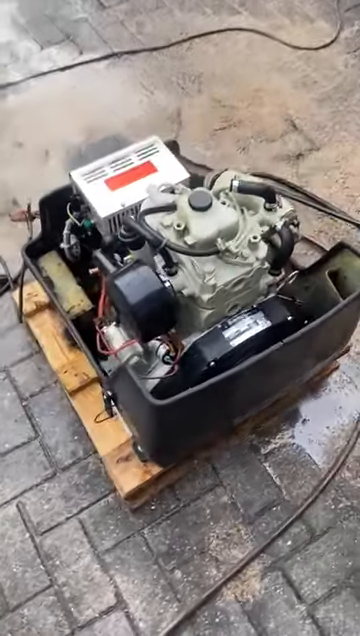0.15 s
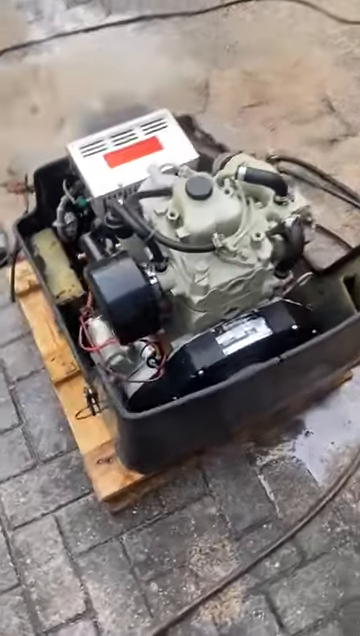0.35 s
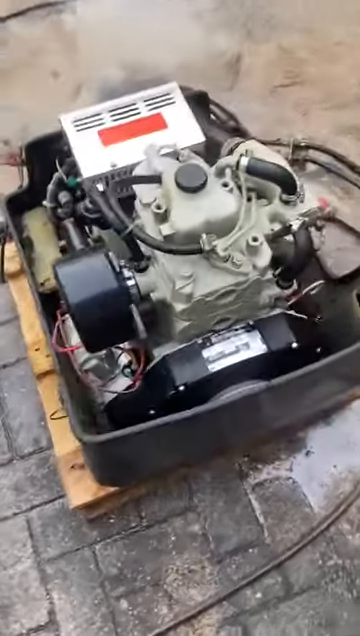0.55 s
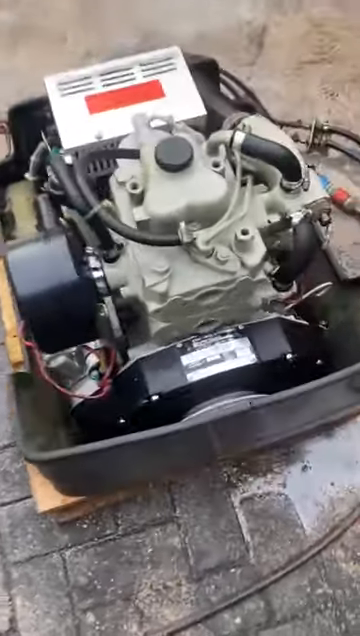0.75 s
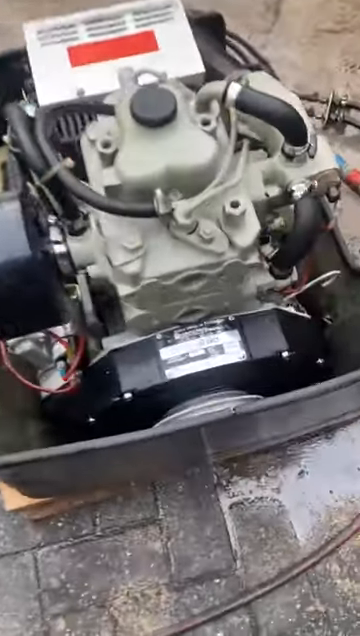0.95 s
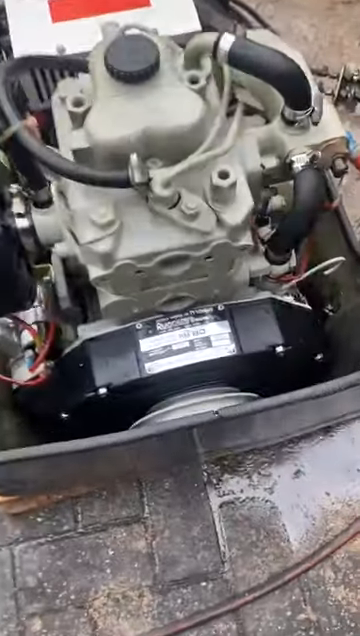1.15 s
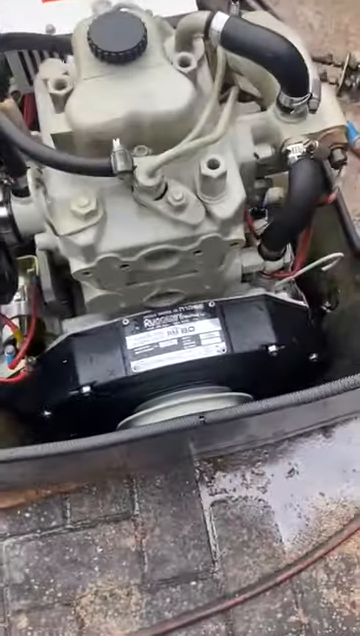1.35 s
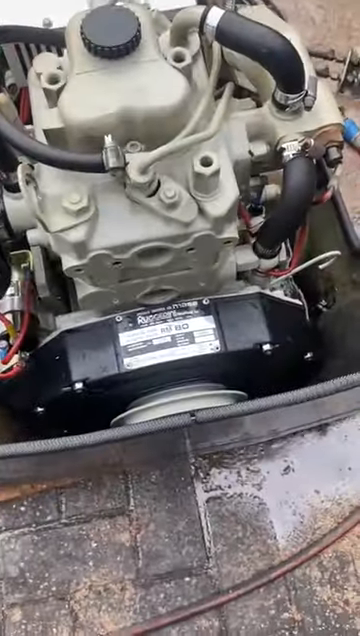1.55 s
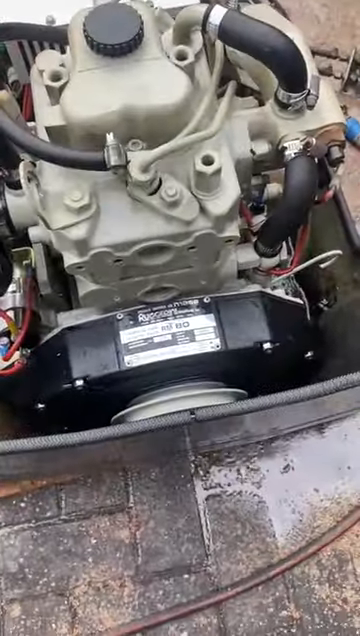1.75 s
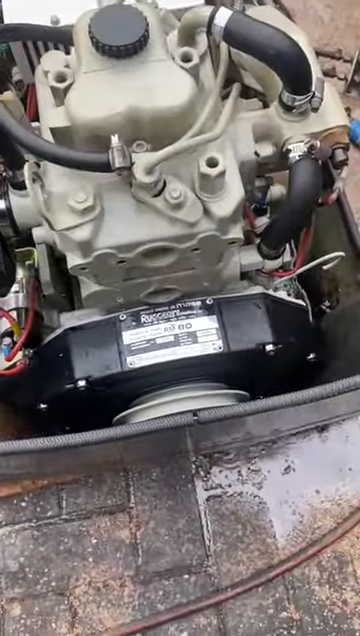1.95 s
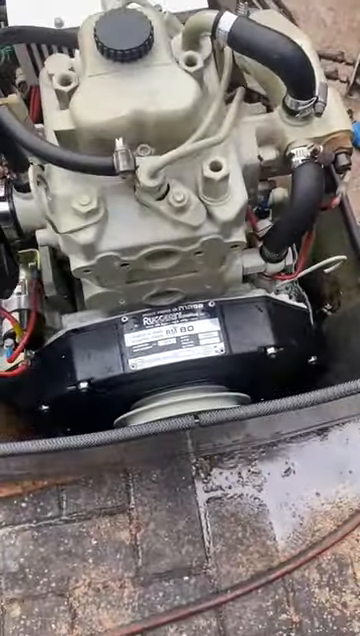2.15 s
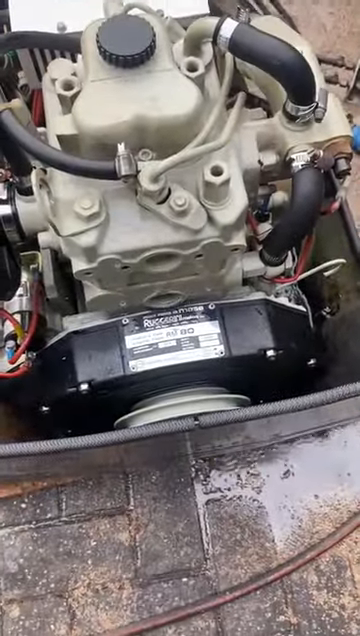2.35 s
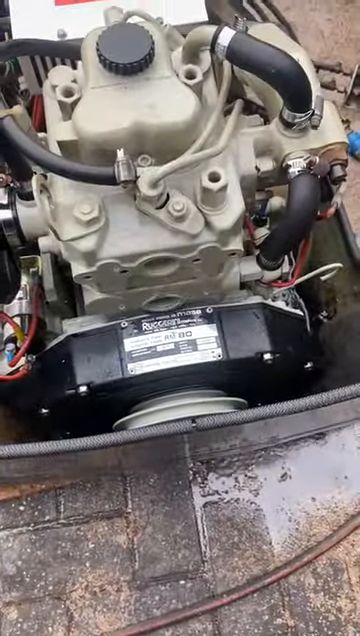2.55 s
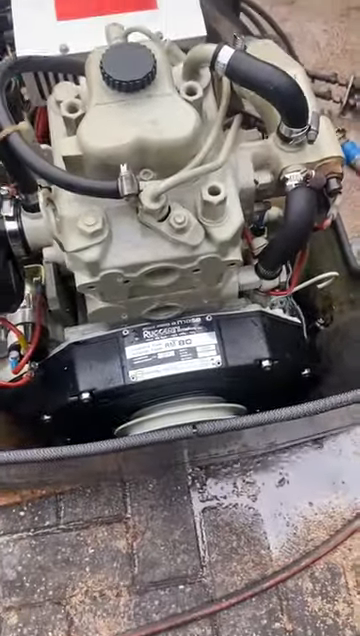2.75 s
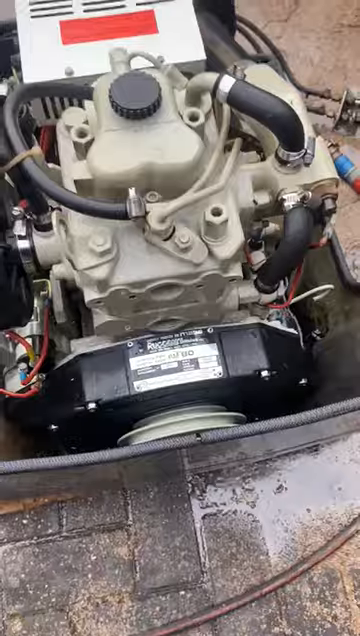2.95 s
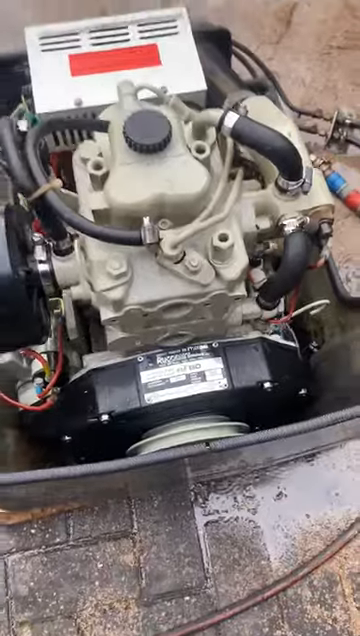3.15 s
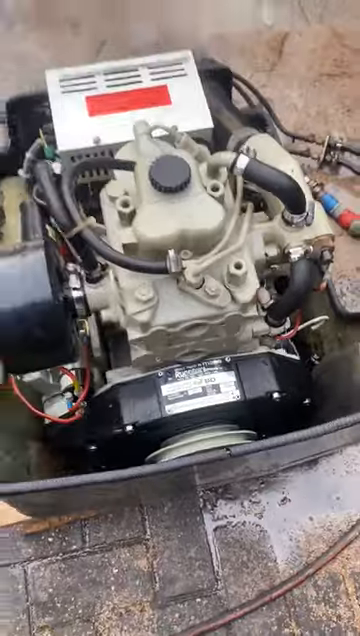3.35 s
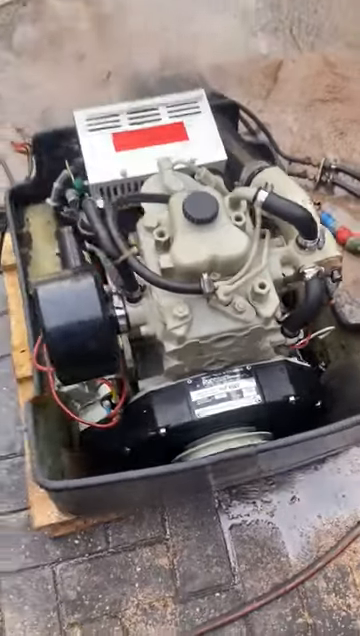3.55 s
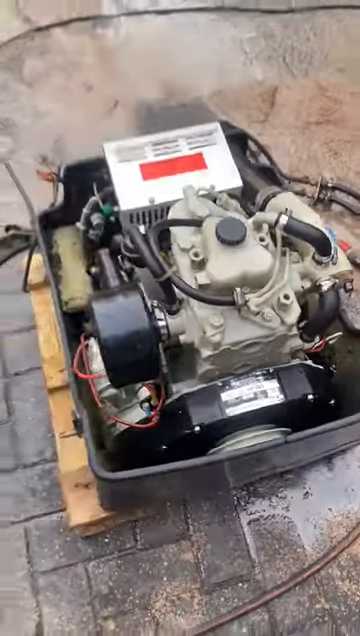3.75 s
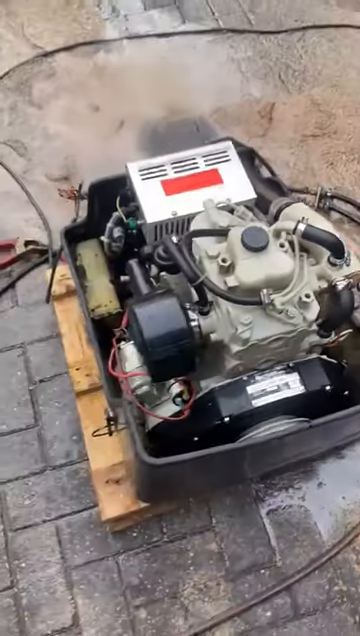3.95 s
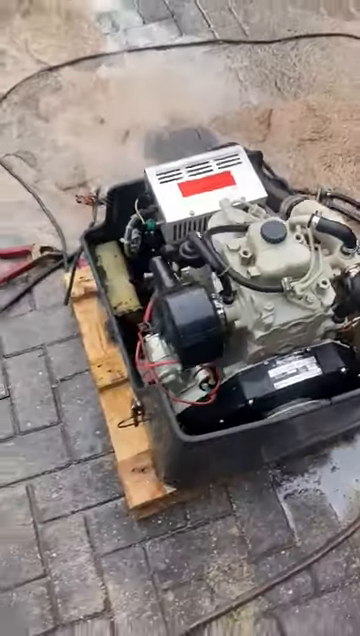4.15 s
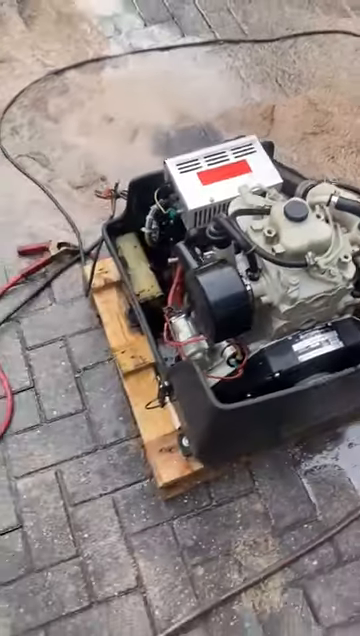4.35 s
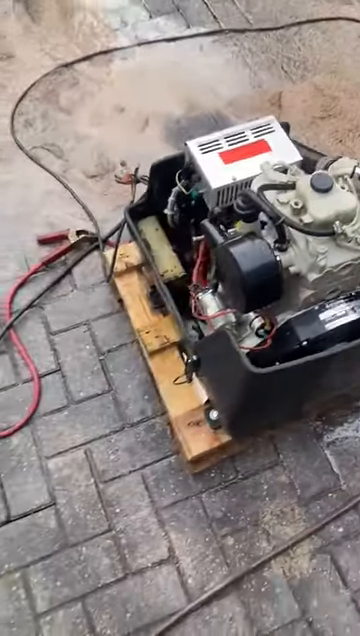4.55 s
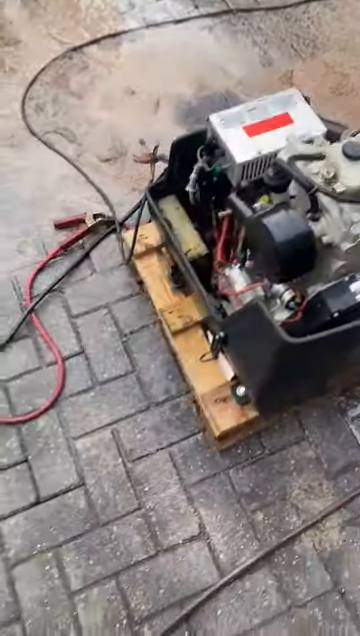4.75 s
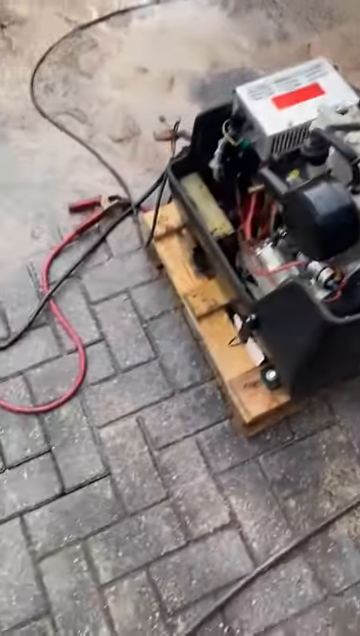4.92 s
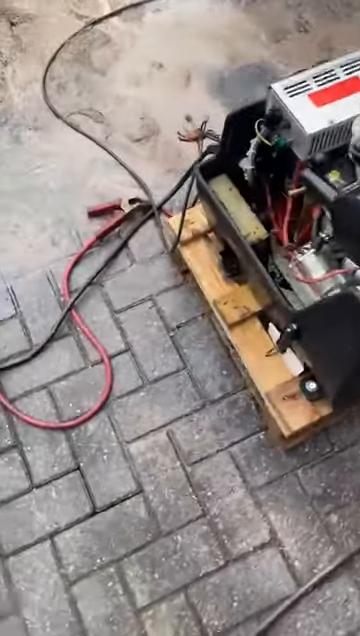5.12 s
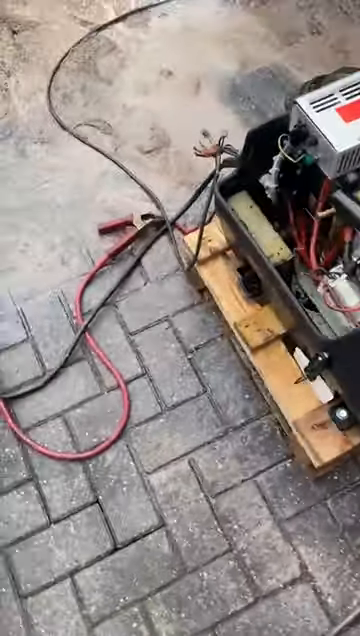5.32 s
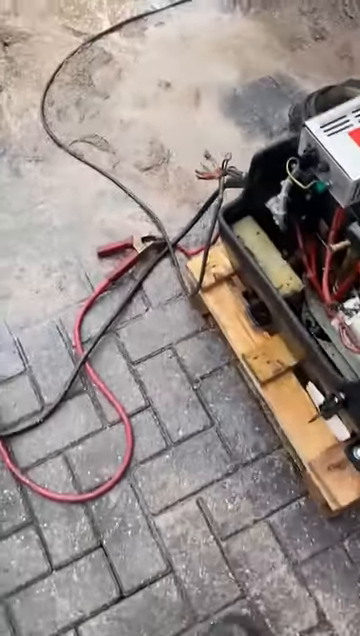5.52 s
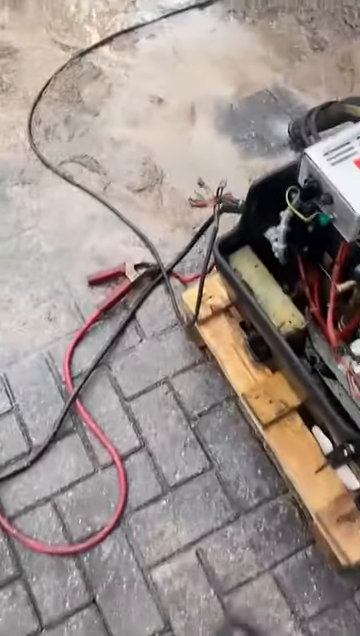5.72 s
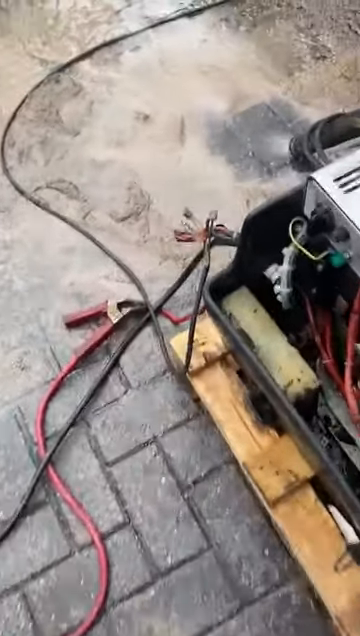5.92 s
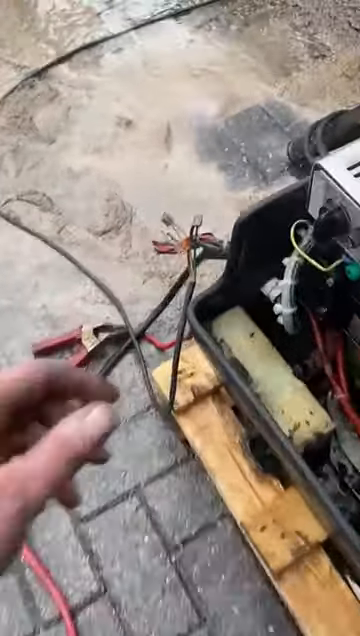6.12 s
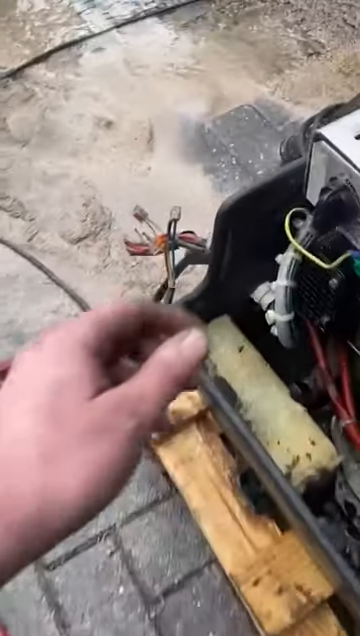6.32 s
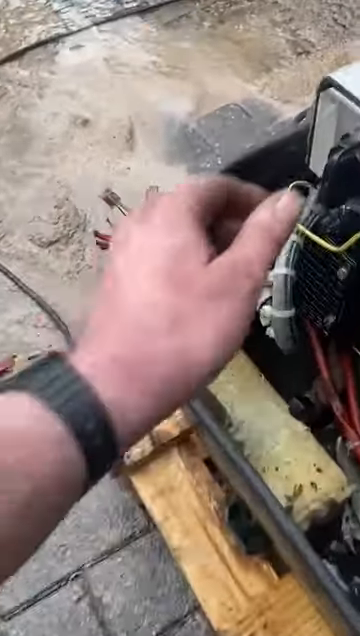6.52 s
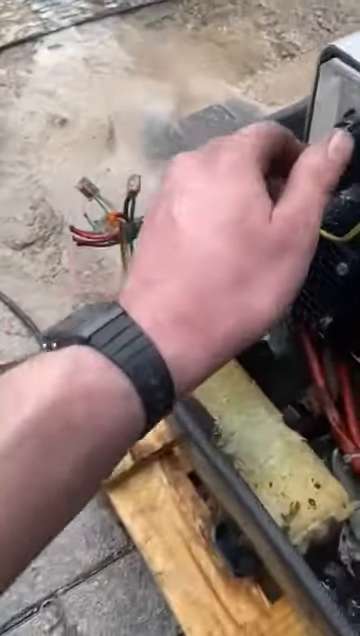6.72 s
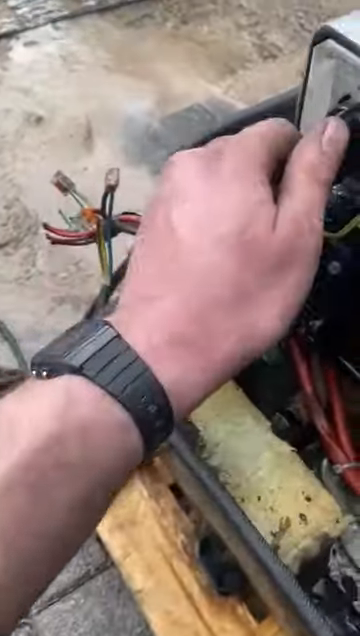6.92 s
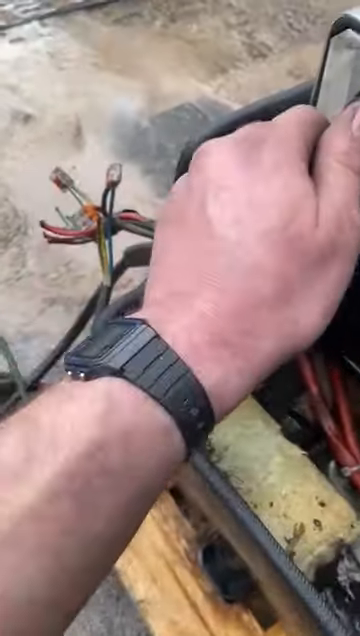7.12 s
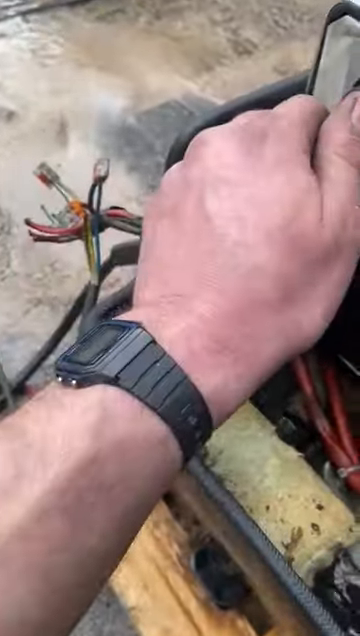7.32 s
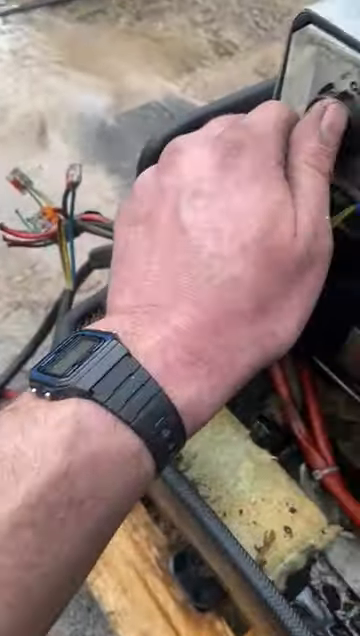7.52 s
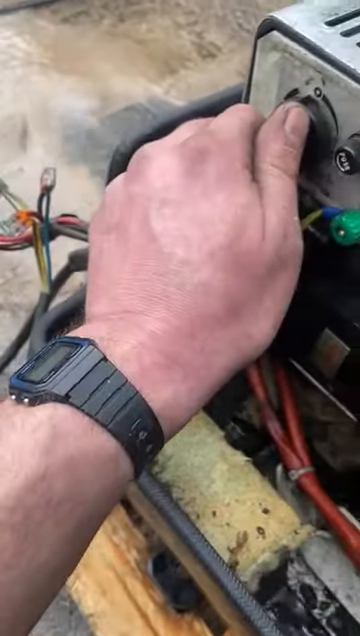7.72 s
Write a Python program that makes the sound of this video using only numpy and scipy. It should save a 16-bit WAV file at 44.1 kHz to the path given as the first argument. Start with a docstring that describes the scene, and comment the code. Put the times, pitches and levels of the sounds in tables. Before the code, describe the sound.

Rapid, even diesel popping with metallic knocks, valve ticks and faint gear whine, heard from a moving close microphone outdoors, never stopping.

```python
"""A single-cylinder diesel generator runs at a slightly hunting speed in a paved yard; the listener leans in over it,
backs off, then walks past the exhaust outlet to the control panel. In each cycle blows and ticks ring block, head,
rockers and casing, then the valve opens: pipe and silencer ring and the exhaust pops as a falling chirp.
Noise hisses and gear sines whine throughout; the paving returns a dulled echo whose lag follows the listener."""
import sys
import numpy as np
from scipy import signal
from scipy.fft import rfft, irfft, next_fast_len
from scipy.io import wavfile

SR = 44100
rng = np.random.default_rng(int(sys.argv[2]) if len(sys.argv) > 2 else 0)


def int16_out(signal):
    """Quantize to a 16-bit WAV file."""
    q = np.round(np.clip(np.atleast_2d(signal).T, -1, 1) * 32767)
    wavfile.write(sys.argv[1], SR, q.astype(np.int16))


def makeup_ratio(level_db):
    """Linear amplitude ratio for a level in decibels (20 dB per factor of ten)."""
    decades = np.asarray(level_db, float) / 20
    return 10 ** decades


N = 347508
LEAD = SR // 2      # samples run before the start: the engine is already going
SIZE = N + LEAD

# Blows on block and head in one cycle. Each row: time after the pop in ms, level on the block in dB,
# level on the head in dB, level on the head at the panel end in dB, scatter in dB.
BLOW_ROWS = [(-13.5, -6, -4, -4, 1.1), (-10.5, -2.5, -0.5, -3, .6), (-9, -6, -5.5, -11, 1.5),
             (-0.86, -0.5, -7.5, -2.5, 0.7), (6.5, -16, -13.5, -15, 2.5), (9.5, -9.5, -9, -4, 1),
             (14, -19, -12.5, -16, 3), (19, -13.5, -14.5, -9, 1.5)]


def rms_one(x):
    """Scale to rms 1."""
    return x / np.sqrt(np.mean(x ** 2) + 1e-20)


def in_time(rows, t):
    """Columns of a table read at the times t."""
    s, *columns = np.transpose(rows)
    return [np.interp(t, s, c) for c in columns]


def at_hz(rows, hz):
    """Columns of a table read on a log-frequency axis."""
    f, *columns = np.transpose(rows)
    return [np.interp(np.log(hz), np.log(f), c) for c in columns]


def by_place(values, place):
    """A value given for each of the five places, read along the walk."""
    return np.interp(place, np.arange(len(values)), values)


def drift(rate_hz):
    """Slow random wander of rms 1: noise through two equal poles at SR / 40."""
    r = np.exp(-80 * np.pi * rate_hz / SR)
    noise = rng.standard_normal(SIZE // 40 + 2002)
    slow = signal.lfilter([1], [1, -2 * r, r * r], noise)[2000:]
    return np.interp(np.arange(SIZE) / 40, np.arange(len(slow)), rms_one(slow))


def running(t):
    """The governor hunts a little: cycle count, time since the nearest pop, and the time of every pop."""
    # Each row: time in s, speed in cycles per s.
    speed_rows = [(0, 26.2307), (4.0, 26.1085), (4.9, 26.1726), (6.5, 26.1364), (7.9, 26.1685)]
    first_pop_s = 0.0141
    speed_hz, = in_time(speed_rows, t)
    cycles = np.cumsum(speed_hz) / SR
    cycles -= np.interp(first_pop_s, t, cycles)
    cycle_s = 1 / speed_hz.mean()
    whole = np.arange(np.ceil(cycles[0]) + 1, cycles[-1] + 1)
    return dict(
        speed_hz=speed_hz, cycles=cycles, cycle_s=cycle_s,
        since_ms=1000 * cycle_s * (cycles - np.round(cycles)),
        index=(np.round(cycles) - np.round(cycles[0])).astype(int),
        pops_s=np.interp(whole, cycles, t + LEAD / SR, right=SIZE / SR))      # from the start of the lead


def walking(t):
    """Where the listener is: distance, share of the way round, echo detour, casing pitch there and place."""
    # Each row: time in s, distance in m, way round to the panel end from 0 to 1,
    # extra path over the paving in m, pitch of the open casing heard there in Hz.
    walk_rows = [(0, 0.94, 0, 1.31, 1580), (.55, 0.82, 0.2, 1.38, 1720), (.9, 0.56, 0, 0.7, 1735),
                 (1.3, 0.51, 0.03, 0.866, 1700), (1.9, 0.51, 0, 0.83, 1710), (2.8, 0.51, 0, 0.89, 1713),
                 (3.25, 0.54, 0.07, 0.81, 1720), (3.6, 0.7, 0.14, 1.31, 1750),
                 (4.3, 0.87, 0.19, 1.27, 1580), (4.8, 0.95, 0, 1.2, 1630), (5.2, 1.12, 0.31, 0.94, 1610),
                 (5.8, 0.72, 0.36, 1.16, 1450), (6.25, 0.51, 0.85, 1.05, 1470),
                 (6.55, 0.41, 0.95, 0.96, 1570), (7.0, 0.46, 1, 0.74, 1750), (7.88, 0.54, 1, 0.72, 1740)]
    # Each row: time in s, place (0 leaning over, 1 in front, 2 at the corner, 3 by the outlet, 4 at the panel);
    # values below 0 count as 0.
    place_rows = [(0, 1.5), (.5, 0.56), (.95, -0.5), (3.2, -0.5), (3.7, 1.5), (4.45, 0.74), (4.9, 1.5),
                  (5.55, 2.5), (5.95, 3.5), (6.3, 3.5), (6.65, 3.5)]
    distance_m, round_share, detour_m, casing_hz = in_time(walk_rows, t)
    place = np.clip(in_time(place_rows, t)[0], 0, 4)
    return dict(distance_m=distance_m, round_share=round_share, detour_m=detour_m,
                casing_hz=casing_hz, place=place)


def heard(part, listener):
    """Level in dB of one part: distance law, followed in part, plus a gain on the way to the panel."""
    # Each entry: level at leaning distance in dB, share of the distance law followed, gain at the panel end in dB.
    part_levels = {"pipe": (-18.5, 0.48, 0.94), "case": (-20.3, 0.67, 6.8), "silencer": (-27, -0.63, 2.1),
                   "pop": (-22.5, 0.59, 0.92), "block": (-25.5, 0.76, -2.2), "head": (-32.5, 0.3, 3),
                   "rockers": (-39, 0.75, 3.6), "hiss": (-31, 1.04, 0.11), "gears": (-38.5, 0.13, 2.8),
                   "cover": (-27.5, 2, -3.5), "panel": (-38, 1.0, 9), "whirr": (-40.5, 1.8, 1.7),
                   "casing": (-29, 2.4, -1.7), "echo against pop": (-15.5, 1.1, -2.5),
                   "fan against hiss": (-1.25, -0.17, 3.4)}
    leaning_m = 0.5
    db, share, panel_db = part_levels[part]
    distance_db = 20 * np.log10(listener["distance_m"] / leaning_m)
    return db - share * distance_db + panel_db * listener["round_share"]


def ring(clicks, hz, t60_s):
    """A click train sets one two-pole mode ringing; rms 1."""
    r, w = makeup_ratio(-60 / (t60_s * SR)), 2 * np.pi * hz / SR
    return rms_one(signal.lfilter([0, 1], [1, -2 * r * np.cos(w), r * r], clicks + 1e-18))


def struck(modes, pops_s, place, ms, db, scatter_db, jitter_ms, swing=1):
    """Blows of scattered time and strength ring every mode; each place hears its own mix; rms 1."""
    late_ms = ms + jitter_ms * rng.standard_normal((len(pops_s), len(ms)))
    at = ((pops_s[:, None] + late_ms / 1000) * SR).astype(int)
    at = np.clip(at, 0, SIZE - 1)
    out = 0
    for k, (hz, t60_s, *levels_db) in enumerate(modes):
        clicks = np.zeros(SIZE)
        clicks[at] = makeup_ratio(db + scatter_db * rng.standard_normal(at.shape))
        gain = swing ** k * makeup_ratio(by_place(levels_db, place))      # negative swing: neighbours start opposite
        out = out + gain * ring(clicks, hz, t60_s)
    return rms_one(out)


def block_and_head(engine, listener):
    """Each cycle's blows ring the modes of block and head; the head's blow levels shift toward the panel."""
    # Each row: mode in Hz, T60 in s, relative level in dB at each of the five places.
    block_modes = [(337.6, 0.19, -6.5, 5, -2.5, -0.5, 2), (418.8, 0.43, 1.5, 0.5, 5.5, 2, 2),
                   (444.2, 0.1, -2, -6, -5, -10, 6), (493, 0.33, 5, -25, -13.0, -9, -11.5),
                   (575.6, 0.21, -0.5, -14, 0.5, -2, 2), (616, 0.36, -6, -2, 1, -11, -2.5),
                   (690, 0.16, -28, -15, -10, -7, -9), (758.6, 0.18, 4, 5, 5, 0.5, -8),
                   (870.4, 0.061, -6, 0, 5.5, -6, 1.5), (925, 0.17, -5, -7.5, -4.5, -5, -8),
                   (1072, 0.093, -1.5, -7, -10, 0.5, -3), (1171, 0.2, -4.5, -3, -13, -8, -9.5),
                   (1278, 0.073, -10, -11, -8.5, -16, -21)]
    # Each row: mode in Hz, T60 in s, relative level in dB at each of the five places.
    head_modes = [(1570, 0.039, -3, -6.5, -7, -2, -2), (1850, 0.037, -1.5, -4.5, -3, -4, -12),
                  (2078, 0.045, 0, -2.5, -5, -4, -5), (2274, 0.01, -3, 3.5, 4, 6.5, 1),
                  (2500, 0.05, -3, -5.5, -2, -10, -7), (2670, 0.17, -13, -6, -14, -3, -5)]
    pops_s, place = engine["pops_s"], listener["place"]
    ms, block_db, head_db, head_at_panel_db, scatter_db = np.transpose(BLOW_ROWS)
    round_at_pop = np.interp(pops_s, np.arange(SIZE) / SR, listener["round_share"])[:, None]
    head_db = head_db + (head_at_panel_db - head_db) * round_at_pop
    block = struck(block_modes, pops_s, place, ms, block_db, scatter_db, jitter_ms=0.014, swing=-1.012)
    head = struck(head_modes, pops_s, place, ms, head_db, scatter_db, jitter_ms=0.037)
    return makeup_ratio(heard("block", listener)) * block + makeup_ratio(heard("head", listener)) * head


def valve_ticks(engine, listener):
    """The valve gear ticks on the rockers, mostly while the cylinder breathes."""
    # Each row: mode in Hz, T60 in s, relative level in dB at each of the five places.
    rocker_modes = [(2930, 0.03, -16.5, -22, -9, -3, -13), (3540, 0.012, -6.5, -11, -6.5, -6.5, -7.5),
                    (3987, 0.05, -15, -3.5, -17.5, -18, -16), (4580, 0.03, -8, -8, -16, -14, -15),
                    (4900, 0.03, -23, -18, -25.5, -11, -13), (5140, 0.024, -21, -5, -27, -15.5, -7.5),
                    (5810, 0.016, -12.5, -18, -31, -12, -3)]
    # Each row: time after the pop in ms, level in dB, scatter in dB.
    tick_rows = [(-13.5, -3, 3), (-10, -5.5, 3.5), (2.5, -1.5, 2), (6, -6.5, 4), (8.5, -4, 4), (11, 2, 0.5),
                 (14, -3, 1.5), (16.5, -3.5, 2.5)]
    ms, db, scatter_db = np.transpose(tick_rows)
    rockers = struck(rocker_modes, engine["pops_s"], listener["place"], ms, db, scatter_db, jitter_ms=0.12)
    return makeup_ratio(heard("rockers", listener)) * rockers


def knock_tone(engine, hz, db, t60_ms, starts_ms, scatter_db=0.8):
    """One dying tone after each combustion knock, with a strength and pitch (1 % spread) of its own."""
    cycle_ms = 1000 * engine["cycle_s"]
    since_ms, index = engine["since_ms"], engine["index"]
    after_ms = (since_ms - starts_ms) % cycle_ms
    knock = index - (since_ms < starts_ms)
    strength, detune = rng.standard_normal((index.max() + 1, 2))[knock].T
    shape = (1 - np.exp(-after_ms / 0.89)) * makeup_ratio(-60 * after_ms / t60_ms)
    shape = shape * np.sqrt(28 * cycle_ms / t60_ms)      # about equal power whatever the T60
    turns = hz * (1 + 0.01 * detune) * after_ms / 1000
    return makeup_ratio(db + scatter_db * strength) * shape * np.sin(2 * np.pi * turns)


def sheet_metal(engine, listener):
    """Open casing, shroud, rocker cover and panel sheet each answer the knock with one dying tone."""
    # Casing level in dB at each of the five places.
    casing_levels_db = (1.5, 2.5, -5, -5, 7.5)
    # Shroud level in dB at each of the five places.
    shroud_levels_db = (-35.5, -39.5, -41, -45, -37)
    t60_ms, t60_at_panel_ms = 39, 14.5
    casing_t60_ms = t60_ms + (t60_at_panel_ms - t60_ms) * listener["round_share"] ** 3
    casing_db = heard("casing", listener) + by_place(casing_levels_db, listener["place"])
    shroud_db = by_place(shroud_levels_db, listener["place"])
    out = knock_tone(engine, listener["casing_hz"], casing_db, casing_t60_ms, starts_ms=-13.5)
    out += knock_tone(engine, 2093, shroud_db, t60_ms=12, starts_ms=-12.5)
    out += knock_tone(engine, 800, heard("cover", listener), t60_ms=22, starts_ms=-13.0, scatter_db=0.3)
    out += knock_tone(engine, 2246, heard("panel", listener), t60_ms=12.4, starts_ms=-13.0)
    return out


def throb(engine, listener):
    """Combustion rings the low case modes; the opening valve rings pipe and silencer."""
    # Each row: mode in Hz, T60 in s, relative level in dB at each of the five places.
    case_modes = [(107.5, 0.5, -8.0, -9.5, -6.5, -8.0, -5.5), (154, 0.5, 0.0, 1.5, 2.5, -2.5, -0.5),
                  (185, 0.5, -2.0, -3.5, -2.5, -1.5, -2.0)]
    # Each row: mode in Hz, T60 in s, relative level in dB at each of the five places.
    pipe_modes = [(52, 0.45, -4.5, -6.5, -6.0, -5.5, -4.0), (79.8, 0.45, -0.5, 0.5, 0.0, 0.0, 0.5),
                  (129.8, 0.45, -7.5, -11.0, -10.0, -7.0, -10.5)]
    # Each row: mode in Hz, T60 in s, relative level in dB at each of the five places.
    silencer_modes = [(235.2, 0.43, -1.5, 0, 0, 2.5, -3.5), (287.2, .35, -12.5, -6.5, -12.5, -7.5, -9),
                      (314.1, .2, -28, -19.5, -14, -11, -11.5)]
    burning_ms, opening_ms = np.array([-13.4]), np.array([-1.9])      # after the pop
    pops_s, place = engine["pops_s"], listener["place"]
    case = struck(case_modes, pops_s, place, burning_ms, 0, 0.34, jitter_ms=0.099)
    pipe = struck(pipe_modes, pops_s, place, opening_ms, 0, 0.33, jitter_ms=0.3)
    silencer = struck(silencer_modes, pops_s, place, opening_ms, 0, 0.26, jitter_ms=0.027)
    out = makeup_ratio(heard("case", listener)) * case
    out += makeup_ratio(heard("pipe", listener)) * pipe
    return out + makeup_ratio(heard("silencer", listener)) * silencer


def exhaust_pop(engine, listener):
    """The exhaust slug leaves the pipe as a short falling chirp, its bass partly shielded by the casing."""
    # Each row is one place: pitch at the peak in Hz, fall of pitch in ms, tail in ms, level in dB,
    # share of the bass shielded from 0 to 1.
    pop_rows = [(635, 1.94, 2.08, -1.1, .15), (687, 2.26, 1.58, 0.2, .15), (640, 3.4, 1.84, -0.1, .3),
                (600, 7.8, 2.3, -0.1, .5), (560, 6.2, 1.6, -1.4, .55)]
    rise_ms, bass_hz = 0.76, 250
    outlet_at, outlet_width, outlet_db = 0.56, 0.47, 5      # on the way round, 0 to 1
    since_ms, index = engine["since_ms"], engine["index"]
    hz, fall_ms, tail_ms, db, shielded = (by_place(c, listener["place"]) for c in np.transpose(pop_rows))
    strength = makeup_ratio(0.5 * rng.standard_normal(index.max() + 1))[index]
    turns = hz * fall_ms / 1000 * (1 - np.exp(-np.maximum(since_ms, -6) / fall_ms))
    envelope = np.exp(-(since_ms / np.where(since_ms < 0, rise_ms, tail_ms)) ** 2)
    chirp = rms_one(strength * envelope * np.cos(2 * np.pi * turns - 0.7))
    facing = np.exp(-((listener["round_share"] - outlet_at) / outlet_width) ** 2)
    puff = makeup_ratio(heard("pop", listener) + db + outlet_db * facing) * chirp
    bass = signal.sosfiltfilt(signal.butter(2, bass_hz, fs=SR, output="sos"), puff)
    return puff - shielded * bass


def gear_whine(engine, listener):
    """Sines locked to the engine at tooth-meeting rates, wandering in level and phase."""
    # Each key: teeth met per cycle; its values: relative level in dB at each of the five places.
    gear_levels = {75: (-5, -22, -6, -17, -18), 90: (-1, 2.5, -2, -2, 1.5), 120: (-24, -23, -9, -17, -10.5),
                   135: (-4.5, -16, -8, -14, -9), 150: (-11, -9.5, -21, -21, -15)}
    cycles = engine["cycles"]
    once_per_cycle_db = 1.9 * np.cos(2 * np.pi * (cycles + 0.27))
    out = 0
    for teeth, levels_db in gear_levels.items():
        db = heard("gears", listener) + by_place(levels_db, listener["place"])
        db = db + 2.6 * drift(17) + once_per_cycle_db
        out = out + makeup_ratio(db) * np.sin(2 * np.pi * teeth * cycles + 0.5 * drift(4.3))
    return out


def repeating(engine, place):
    """Small running-gear contacts repeat every cycle, in a pattern of their own at each place; two noises."""
    steps = round(SR / engine["speed_hz"][0])
    patterns = rng.standard_normal((2, 6, steps))
    patterns = rms_one(patterns * makeup_ratio(4.4 * rng.standard_normal(patterns.shape)))      # some are much harder
    step, here = (engine["cycles"] % 1 * steps).astype(int), place.astype(int)
    turn = np.pi / 2 * (place - here)
    return np.cos(turn) * patterns[:, here, step] + np.sin(turn) * patterns[:, here + 1, step]


def fan_and_gear_hiss(engine, listener):
    """Bands of noise, partly repeating each cycle, that swell with the blows or, at 3.8-7 kHz, the breath."""
    # Each row: frequency in Hz, relative density in dB per Hz.
    density_rows = [(30, 17), (80, 7.5), (230, 12), (500, 7), (800, 5), (1300, 0.5), (2100, 1), (3000, -3),
                    (4500, -5), (6000, -5), (7300, -4.5), (8600, -10), (10000, -13.5), (10800, -15),
                    (13000, -7)]
    repeats_low, repeats_mid, repeats_high = 0.51, 0.62, 0.12      # power shares: under 1.2, under 5, over 5 kHz
    breath_ms, breath_width_ms, breath_peak_db = 8.7, 7.2, 2      # air is drawn in
    rumble_share = 0.42      # low noise fills the yard and follows the listener only in part
    treble_share = 1.3      # from 4 to 7 kHz it is beamed and falls faster with distance
    looped = repeating(engine, listener["place"])
    white = rng.standard_normal((2, SIZE))
    since_ms = engine["since_ms"]
    swell = sum(makeup_ratio(db) * np.exp(-((since_ms - ms - 1.0) / 1.3) ** 2) for ms, db, *_ in BLOW_ROWS)
    breath_db = breath_peak_db * np.exp(-((since_ms - breath_ms) / breath_width_ms) ** 2)
    level_db, fan_db = heard("hiss", listener), heard("fan against hiss", listener)
    moves_db = level_db - level_db.mean()
    rumble_db = level_db.mean() + rumble_share * moves_db
    beamed_db = (treble_share - 1) * moves_db
    out = 0
    edges_hz = 28 * 2 ** np.arange(0, 9.3, 0.4)
    for k, (low, high) in enumerate(zip(edges_hz, edges_hz[1:])):
        share = repeats_low if low < 1200 else repeats_mid if low < 5000 else repeats_high
        noise = np.sqrt(1 - share) * white[k % 2] + np.sqrt(share) * looped[k % 2]
        band = signal.sosfilt(signal.butter(2, [low, high], "band", fs=SR, output="sos"), noise)
        db = at_hz(density_rows, np.sqrt(low * high))[0] + 1.65 * drift(29)
        db = db + (level_db if low > 1200 else rumble_db)
        db = db + (breath_db - 0.64 if 3800 < low < 7000 else 3.5 * swell)
        db = db + (fan_db if high > 7000 else beamed_db * (low > 3800))
        out = out + band * makeup_ratio(db)
    return makeup_ratio(11.5) * out


def alternator_whirr(listener):
    """Cooling air sings over the alternator slots: noise twice through one resonance."""
    centre_hz, width_hz = 3556, 320
    r, w = np.exp(-np.pi * width_hz / SR), 2 * np.pi * centre_hz / SR
    b, a = [1, 0, -1], [1, -2 * r * np.cos(w), r * r]
    once = signal.lfilter(b, a, rng.standard_normal(SIZE))
    return makeup_ratio(heard("whirr", listener)) * rms_one(signal.lfilter(b, a, once))


def paving_echo(puff, clatter, air, listener):
    """The paving returns the sound late by the extra path; its roughness dulls it."""
    clatter_down_db, air_down_db = -1, -7      # sent to the paving, against the pop
    sound_m_per_s = 343
    downward = puff + makeup_ratio(clatter_down_db) * clatter + makeup_ratio(air_down_db) * air
    samples = np.arange(SIZE)
    echo = np.interp(samples - listener["detour_m"] / sound_m_per_s * SR, samples, downward)
    return makeup_ratio(heard("echo against pop", listener)) * signal.lfilter([0.09], [1, -0.91], echo)


def moving_hollow(x, t):
    """A low-mid band is partly taken out, as when a near reflection cancels; it moves with the listener."""
    # Each row: time in s, centre in Hz, share taken out from 0 to 1 (held to 0.95 at most).
    hollow_rows = [(0, 334, 0), (.55, 387, 0.54), (.72, 390, 0.03), (.76, 535, 0.05), (1.0, 540, 0.7),
                   (3.15, 528, 0.67), (3.4, 535, 0), (3.45, 320, 0.14), (3.65, 333, 0.3), (4.3, 394, 0.6),
                   (5.2, 395, 0.63), (5.9, 427, 1), (6.2, 428, 0.02), (7.88, 430, 0)]
    width_hz = 55
    hz, share = in_time(hollow_rows, t)
    turn = np.exp(2j * np.pi * np.cumsum(hz) / SR)
    r = np.exp(-np.pi * width_hz / SR)
    band = 2 * np.real(signal.lfilter([1 - r], [1, -r], x / turn) * turn)
    return x - np.clip(share, 0, 0.95) * band


def microphone_ports(shared, cycle_s):
    """Two ports differ in phase and level by frequency, and in the sign of a scattered part."""
    # Each row: frequency in Hz, phase lead of the left in radians, left over right in dB, scattered share in dB.
    port_rows = [(60, 0., -1.1, -32), (250, 0., -2.5, -22), (400, 0., -1.2, -16), (650, .1, 1.3, -12),
                 (1100, .15, 1.3, -9), (1500, 0., .5, -18), (1750, 0., 0., -27), (2000, 0., 0., -27),
                 (2300, .6, -1.5, -9), (2700, .9, -1.8, -7), (3400, .5, -1.3, -8), (4500, .7, -.5, -9),
                 (4750, 0., 0., -60), (5450, 0., 0., -60), (5700, .9, 0., -12), (6250, 2.15, 0., -14),
                 (6600, np.pi, 0., -45), (8200, np.pi, 0., -45), (8800, 4.1, 0., -13), (9150, 5.8, 0., -22),
                 (9650, 2 * np.pi, 0., -60), (12000, 2 * np.pi, 0., -60)]
    fft_size = next_fast_len(SIZE)
    lead_rad, balance_db, apart_db = at_hz(port_rows, np.arange(1, fft_size // 2 + 2) * SR / fft_size)
    spectrum = rfft(shared, fft_size)
    # scattered sound takes other paths: a copy some cycles old, opposite in the two
    older = np.roll(shared, round(5.4 * cycle_s * SR))
    scattered = rfft(older, fft_size) * makeup_ratio(apart_db)
    ports = []
    for way in (1, -1):
        tilt = makeup_ratio(way * balance_db / 2) * np.exp(0.5j * way * lead_rad)
        ports.append((spectrum + way * scattered) * tilt)
    return irfft(ports, fft_size)[:, LEAD:SIZE]


def scene():
    """Engine parts as heard along the walk, the paving echo, then the two microphone ports."""
    t = (np.arange(SIZE) - LEAD) / SR
    engine, listener = running(t), walking(t)
    clatter = block_and_head(engine, listener)
    clatter += valve_ticks(engine, listener)
    clatter += sheet_metal(engine, listener)
    low = throb(engine, listener)
    puff = exhaust_pop(engine, listener)
    whine = gear_whine(engine, listener)
    air = fan_and_gear_hiss(engine, listener) + alternator_whirr(listener)
    echo = paving_echo(puff, clatter, air, listener)
    shared = moving_hollow(low + puff + echo + clatter + whine + air, t)
    return microphone_ports(shared, engine["cycle_s"])


def low_pass(x):
    """Removes everything above the highest recorded frequency."""
    return signal.sosfilt(signal.butter(12, 11950, fs=SR, output="sos"), x)


def record(dry):
    """Low and high cut of the microphone, then peaks rounded."""
    cut = signal.sosfiltfilt(signal.butter(3, 36, "high", fs=SR, output="sos"), dry)
    cut = signal.sosfilt(signal.cheby2(12, 50, 12330, fs=SR, output="sos"), cut)
    rounded = 1.282 * np.tanh(cut / 1.409)
    return low_pass(rounded)


dry = scene()
out = record(dry)
int16_out(out)
```